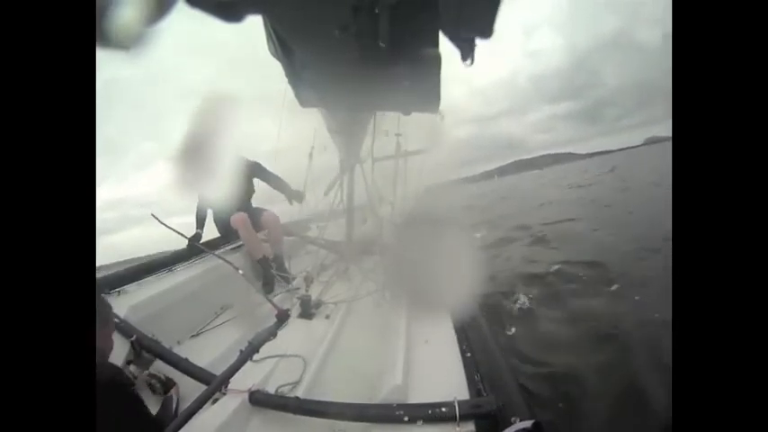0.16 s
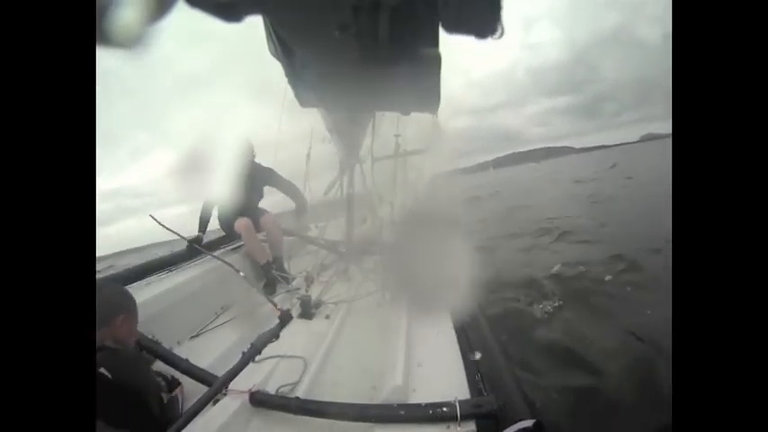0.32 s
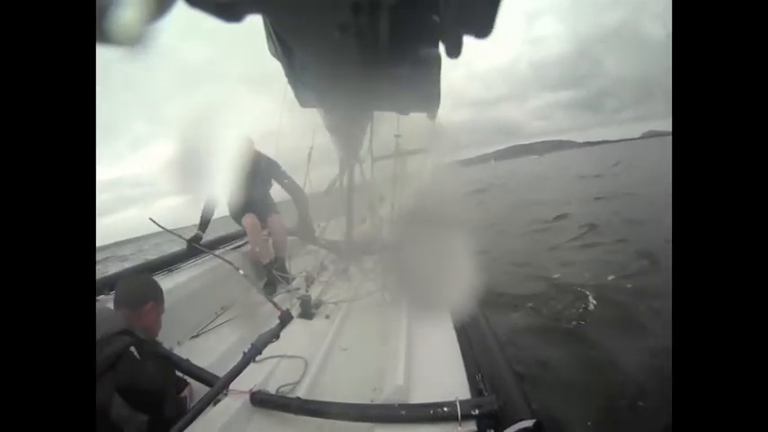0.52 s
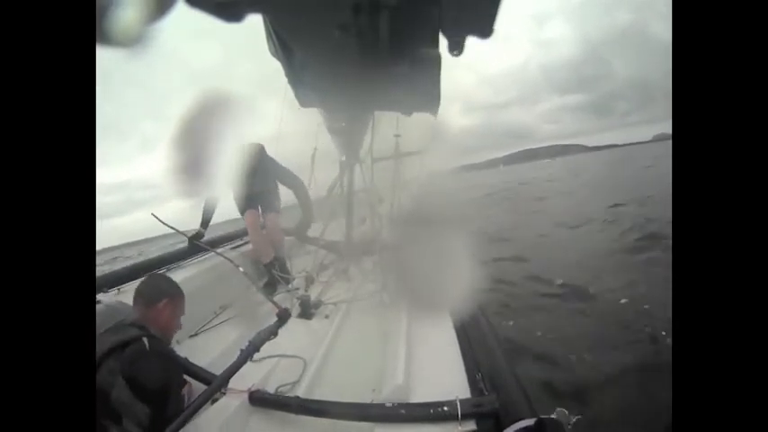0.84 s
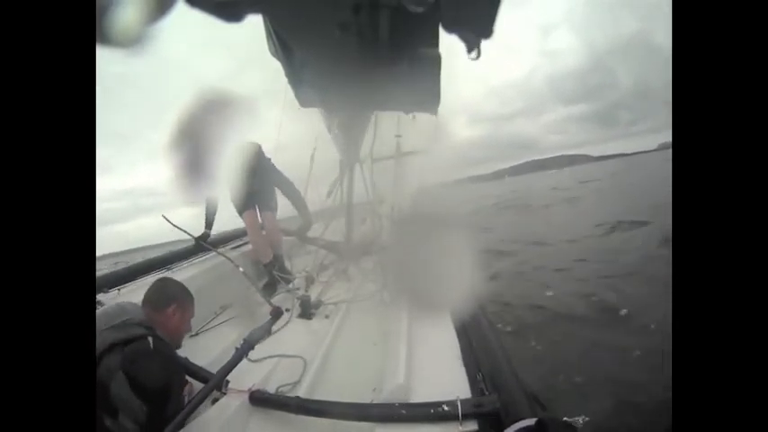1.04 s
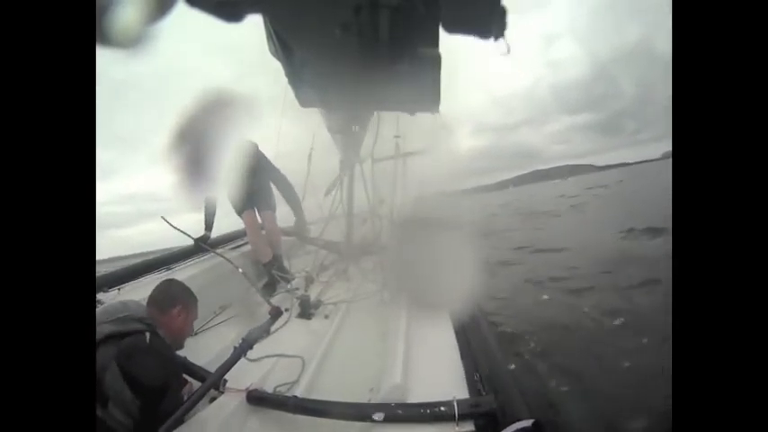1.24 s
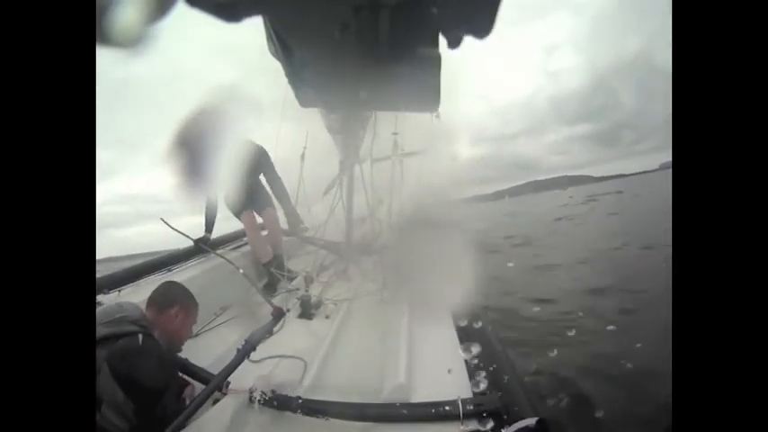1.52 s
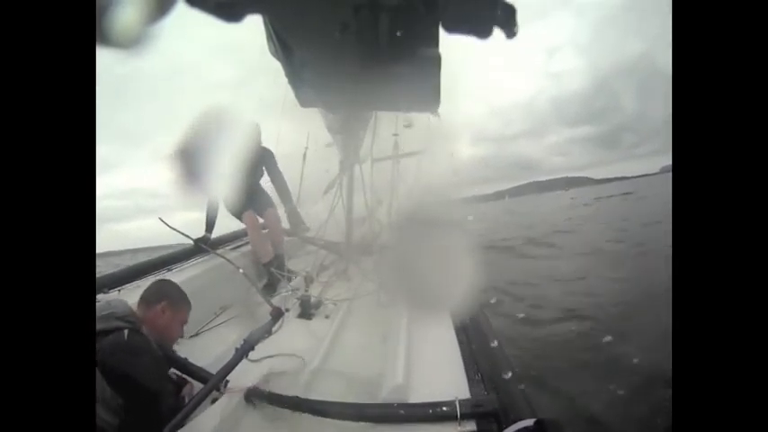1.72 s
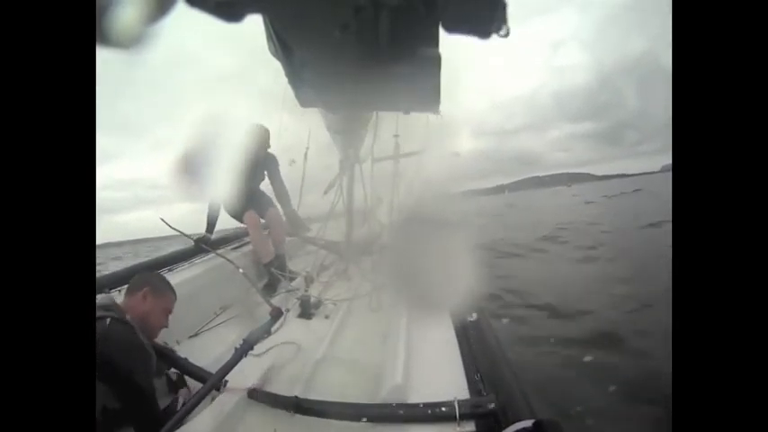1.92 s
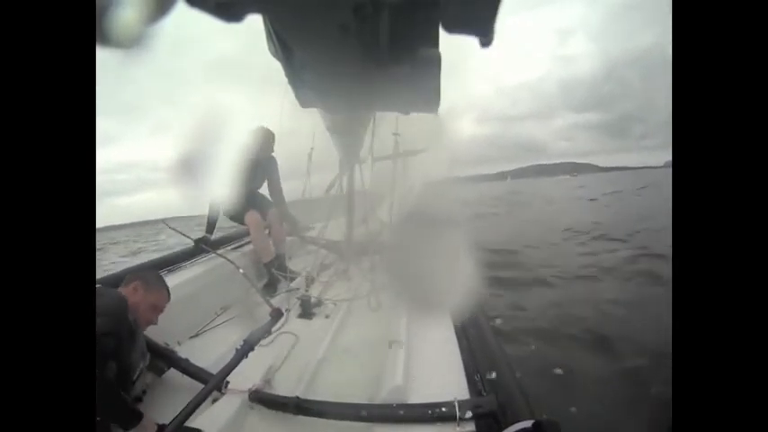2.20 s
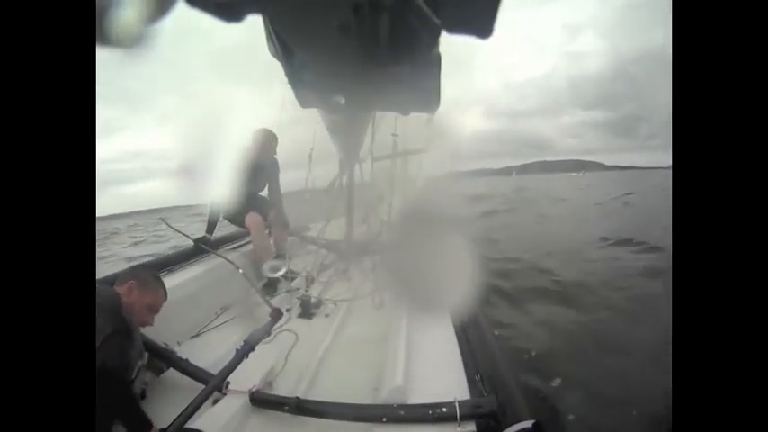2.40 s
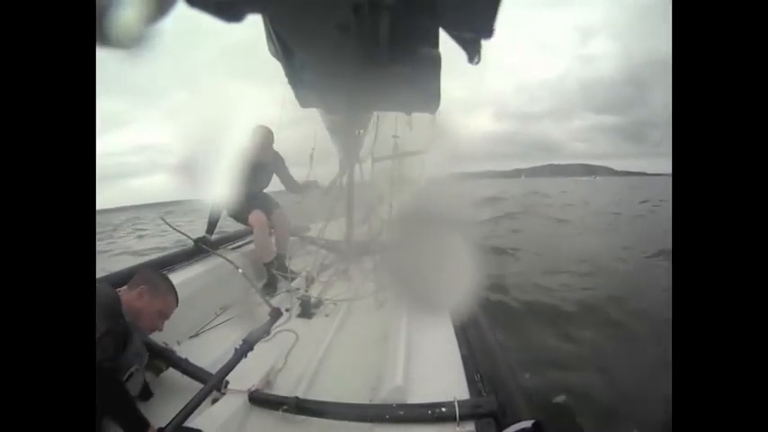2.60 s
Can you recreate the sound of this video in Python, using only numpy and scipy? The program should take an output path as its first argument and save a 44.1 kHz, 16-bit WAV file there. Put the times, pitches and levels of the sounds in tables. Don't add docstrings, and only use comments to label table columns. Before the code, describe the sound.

Water rushing and slapping along a small sailboat hull, with wind booms and one hard wave slam

```python
import sys
import numpy as np
from scipy import signal
from scipy.fft import rfft, irfft
from scipy.io import wavfile
from scipy.ndimage import uniform_filter1d

SR = 44100
rng = np.random.default_rng(int(sys.argv[2]) if len(sys.argv) > 2 else 0)


def unload_audio(sound):
    columns = np.transpose(np.atleast_2d(sound))
    steps = np.round(np.clip(columns, -1, 1) * 32767)
    wavfile.write(sys.argv[1], SR, steps.astype(np.int16))


def boost(x):
    u = np.asarray(x, float) / 20
    return 10 ** u


N = 121275
T = np.arange(N) / SR

# pitch in Hz, width in Hz, level in dB.
LOW_BODY = [(395.8, 31, -11.5), (640, 176, -3.5), (966, 119, -6.5), (1247, 115, -9)]
# pitch in Hz, width in Hz, level in dB.
HIGH_BODY = [(1961, 223, 0.5), (2494, 425, -4), (3260, 193, -0.5), (3916, 358, 0.5), (4273, 110, -3.5),
             (4445, 370, -2), (4733, 740, -3)]
SPREAD_DB = 11.5
SLAM_S = 0.2595


def evened(x):
    return x / np.sqrt(np.mean(x ** 2) + 1e-20)


def add(mix, s, sound):
    part = mix[round(s * SR):][:len(sound)]
    part += sound[:len(part)]


def resonate(x, hz, width):
    turn = np.exp(2j * np.pi * hz * T[:len(x)])
    r = np.exp(-np.pi * width / SR)
    return 2 * (turn * signal.lfilter([1 - r], [1, -r], x / turn)).real


def ring(x, modes):
    click = np.arange(2048) == 0
    body = np.zeros(2048)
    for k, (hz, width, db) in enumerate(modes):
        once = resonate(click, hz, 2 * width)
        body += (-1) ** k * boost(db) * resonate(once, hz, 2 * width)
    return signal.oaconvolve(x, body / np.linalg.norm(body))[:len(x)]


def patchy(gain, patch_db, flicker_db, size):
    frames, hz = 4 * N // size + 5, np.fft.rfftfreq(size, 1 / SR)
    a, b, patches = rng.standard_normal((frames, len(hz), 3)).T
    patches = uniform_filter1d(patches, size=3, axis=0)
    patches = evened(uniform_filter1d(patches, size=9, axis=1))
    flicker = evened(uniform_filter1d(rng.standard_normal(frames), size=4))
    z = (a + 1j * b) * gain(hz)[:, None] * boost(patch_db * patches + flicker_db * flicker)
    return evened(signal.istft(z, nperseg=size, noverlap=3 * size // 4)[1][:N])


def wind():
    # centre in seconds, width in seconds, level in dB, pitch in Hz.
    gusts = [(0.076, 0.096, -25.5, 84.6), (0.115, 0.042, -22, 94.5), (0.151, 0.044, -20.5, 84.2),
             (0.222, 0.021, -23.5, 85), (0.284, 0.016, -5.5, 86.7), (0.355, 0.071, -16, 82.6),
             (0.461, 0.062, -26.5, 88.06), (0.549, 0.0093, -16, 78.8), (0.65, 0.035, -20.5, 105),
             (0.676, 0.032, -14.5, 97.7), (0.711, 0.042, -15.5, 87.1), (0.798, 0.049, -24.5, 84),
             (0.827, 0.023, -14, 87.88), (0.891, 0.084, -24, 77.04), (0.993, 0.067, -15, 81.74),
             (1.085, 0.062, -19, 79.36), (1.152, 0.021, -18.5, 84), (1.271, 0.064, -24.5, 104.6),
             (1.464, 0.071, -20.5, 82.2), (2.223, 0.039, -27.5, 80), (1.695, 0.02, -24.5, 78.8),
             (1.929, 0.05, -33, 80.6), (2.079, 0.063, -25.5, 86.9), (2.169, 0.037, -13.5, 86.62),
             (2.31, 0.075, -21.5, 85.2), (2.362, 0.036, -11.5, 84), (2.422, 0.061, -20.5, 79.74),
             (2.465, 0.034, -26, 79.25), (1.243, 0.022, -24, 122.3), (0.956, 0.016, -20.5, 112),
             (2.495, 0.022, -16.5, 92.4), (2.525, 0.019, -14, 86.67), (2.554, 0.018, -20.5, 86.48)]
    # pitch in Hz, level in dB per Hz.
    spectrum = [(15, 6.5), (30, 5), (42, -0.5), (62, 5.5), (130, -3.5), (190, -17.5), (290, -18),
                (370, -26.5)]
    boom_hz, boom_width_hz, bed_db, overtone_db = 84, 13.5, -34.5, -28.5
    sag = 0.15
    split_hz, deep_follows, upper_follows = 170, 0.45, 0.17

    s, width, db, hz = np.transpose(gusts)[:, :, None]
    power = boost(2 * db) * np.exp(-8 * np.log(2) * ((T - s) / width) ** 2)
    hz = hz * (1 - sag * np.clip((T - s) / width, -1, 1))
    total = power.sum(0)
    pitch = ((power * hz).sum(0) + 1e-7 * boom_hz) / (total + 1e-7)
    turns = 2 * np.pi * np.cumsum(pitch) / SR
    boom = np.sqrt(2 * total) * (np.sin(turns) + boost(overtone_db) * np.sin(2 * turns))

    bed = resonate(rng.standard_normal(N), boom_hz, 2 * boom_width_hz)
    bed = evened(resonate(bed, boom_hz, 2 * boom_width_hz))

    f, level = np.transpose(spectrum)

    def gain(hz):
        return boost(np.interp(np.log(hz + 1), np.log(f), level, left=-30, right=-90))

    rumble = patchy(gain, 3.85, 4.2, size=4096)
    below_split = np.arange(N // 2 + 1) * SR / N < split_hz
    deep = irfft(rfft(rumble) * below_split, N)
    upper = rumble - deep
    swell = 1 + total / boost(2 * bed_db)
    rumble = deep * evened(swell ** (deep_follows / 2)) + upper * evened(swell ** (upper_follows / 2))
    return boom + boost(bed_db) * bed + boost(-31) * rumble


def bubbles(modes):
    per_s, cycles = 45, 8
    out = np.zeros(N)
    for hz in np.geomspace(modes[0][0], modes[-1][0], num=20):
        u = np.arange(0, 3 * cycles, hz / SR) / cycles
        tone = u * np.exp(-3 * u) * np.sin(2 * np.pi * cycles * u)
        size = boost(SPREAD_DB * np.minimum(rng.exponential(1, N), 3)) * (rng.random(N) < per_s / SR)
        out += signal.oaconvolve(size, tone * np.sqrt(hz))[:N]
    return evened(out)


def fizz():
    drops_per_s = 2000
    drops = boost(SPREAD_DB * np.minimum(rng.exponential(1, N), 4)) * (rng.random(N) < drops_per_s / SR)
    return evened(signal.lfilter([1], [1, -.98], drops) * rng.standard_normal(N))


def rush():
    # time in seconds, flow in dB, slosh in dB against the flow.
    flow = [(0.0, -60.5, 11), (0.09, -51.5, 0.5), (0.23, -55, 2.5), (0.46, -52, 5.5), (0.599, -50, 0),
            (0.67, -50, 5), (0.84, -50, -1), (1.48, -51.5, -0.5), (1.67, -54.5, 3), (1.85, -55, 3),
            (2.53, -53, 0), (2.75, -49, -8)]
    fizz_db, bubble_db = -18.5, -13
    s, flow_db, slosh_db = np.transpose(flow)
    out = np.zeros(N)
    for modes, db in ((LOW_BODY, flow_db + slosh_db), (HIGH_BODY, flow_db)):
        wash = patchy(np.ones_like, patch_db=2, flicker_db=2.5, size=256)
        drive = wash + boost(fizz_db) * fizz() + boost(bubble_db) * bubbles(modes)
        out += boost(np.interp(T, s, db)) * evened(ring(drive, modes))
    return out


def plinks():
    # start in seconds, level in dB, pitch in Hz,
    # length in seconds.
    bursts = [(0.116, -28, 184.5, 0.074), (.152, -49, 2080, .008), (0.173, -38.5, 3160, 0.0046),
              (0.498, -40, 3260, 0.0064), (0.613, -34, 616, 0.014), (0.79, -37, 4620, 0.0064),
              (0.812, -39.5, 2000, 0.011), (1.066, -39.5, 3850, .012), (1.188, -39, 3970, 0.0055),
              (1.203, -43.5, 2030, 0.0069), (1.301, -41, 3696, .008), (1.46, -35.5, 4280, 0.004),
              (1.505, -46.5, 3120, 0.0073), (1.518, -42, 3420, 0.0086), (1.573, -39.5, 2077, .01),
              (1.703, -44, 1207, 0.0084), (1.857, -45, 729, 0.014), (2.176, -41, 637, 0.028),
              (2.322, -38.5, 602, 0.0098), (2.494, -42, 3960, 0.01), (2.637, -45, 2170, .012),
              (2.686, -49, 1975, 0.013)]
    rough, rise = 0.6, 0.023
    out = np.zeros(N)
    for s, db, hz, length in bursts:
        u = T[:round(3 * length * SR)] / length
        noise = rng.standard_normal(len(u))
        wobble = 1 + rough * evened(uniform_filter1d(noise, size=len(u) // 12))
        swell = 3 * np.e * u * np.exp(-3 * u)
        tone = np.sin(2 * np.pi * hz * length * (u + rise * u ** 2 / 2))
        add(out, s, boost(db) * wobble * swell * tone)
    return out


def slaps():
    # start in seconds, low part in dB, high part in dB, t60 in seconds.
    hits = [(0.107, -41, -71, 0.17), (0.187, -29, -40, 0.028), (0.232, -33, -62, 0.074),
            (0.261, -45, -54.5, 0.019), (0.322, -37.5, -56, 0.18), (0.436, -28.5, -59, 0.064),
            (0.488, -27.5, -41, 0.028), (0.6, -33, -75, 0.054), (.637, -55, -35, 0.023),
            (0.652, -44, -35, 0.09), (0.665, -42, -38, .06), (0.679, -47, -52, 0.071),
            (0.718, -35.5, -67, 0.1), (0.797, -40, -37.5, 0.042), (.832, -55, -44.5, 0.021),
            (0.819, -38, -36.5, 0.072), (0.861, -30, -37, 0.047), (0.893, -34.5, -66, 0.054),
            (.551, -46, -42.5, 0.043), (.985, -61, -41.5, 0.079), (1.102, -51, -45.5, 0.04),
            (1.278, -55, -48, 0.024), (1.433, -35, -61, 0.042), (1.752, -41.5, -55, 0.06),
            (2.473, -61, -48.5, 0.047), (2.611, -62, -40, 0.054), (1.01, -37, -41.5, 0.11),
            (1.063, -38, -51, 0.12), (1.143, -31.5, -62, 0.094), (1.188, -47, -66.5, 0.029),
            (1.219, -36, -61, 0.11), (1.371, -33.5, -42.5, 0.049), (1.457, -34, -44, 0.04),
            (1.617, -29.5, -45.5, 0.051), (1.702, -57, -50, 0.044), (2.001, -32, -53, 0.066),
            (2.158, -36, -51, 0.23), (2.329, -37.5, -45.5, 0.1), (2.356, -32, -58, 0.091),
            (2.57, -69, -39.5, 0.025), (2.705, -33.5, -50, 0.065)]
    rise_s, bend = 0.0024, 1.4
    low_trim_db, high_trim_db = -8.5, -3.5
    low, high, t = np.zeros(N), np.zeros(N), T[:8000]
    noise = rng.standard_normal((len(hits), 2, 8000))
    for (s, low_db, high_db, t60), (a, b) in zip(hits, noise):
        shape = np.minimum(t / rise_s, 1) * boost(-60 * (t / t60) ** bend)
        add(low, s, boost(low_db + low_trim_db) * shape * a)
        add(high, s, boost(high_db + high_trim_db) * shape * b)
    return ring(low, LOW_BODY) + ring(high, HIGH_BODY)


def knocks():
    # start in seconds, level in dB, pitch in Hz, t60 in seconds.
    blows = [(0.2564, -26, 192, 0.017), (0.601, -27.5, 265, 0.036), (0.897, -28.5, 166, 0.14),
             (0.944, -35, 168, 0.084), (1.242, -31, 166, 0.39), (1.37, -25.5, 191.4, 0.068),
             (1.446, -27.5, 217.5, 0.059), (1.895, -29, 325.2, 0.06), (2.1, -34, 144.5, 0.22),
             (2.16, -32, 215.4, 0.15), (2.22, -33.5, 173, 0.64), (2.356, -27.5, 211.8, .1),
             (2.483, -24.5, 220, 0.053), (2.508, -17.5, 233.7, 0.036)]
    sag = 0.64
    out, t = np.zeros(N), T[:12000]
    for s, db, hz, t60 in blows:
        modes = np.zeros(len(t))
        for ratio, mode_db in ((1, 0), (1.85, -7), (3.4, -15)):
            fall = boost(mode_db - 60 * t * ratio ** 2.3 / t60)
            modes += fall * np.sin(2 * np.pi * hz * ratio * (t - sag * t ** 2))
        add(out, s, boost(db) * np.minimum(t / .0015, 1) * modes)
    return out


def ticks():
    # start in seconds, level in dB, centre in Hz, fall in dB per octave away, rattle in seconds.
    taps = [(.1745, -40, 3200, 8, .0005), (.2590, -26, 1300, 8, .0008), (.2588, -29, 4200, 5, .0025),
            (.323, -22, 700, 12, .0015), (.4365, -28, 750, 12, .003), (.5995, -24, 750, 14, .003),
            (.7185, -29, 800, 14, .003), (1.372, -29, 750, 10, .002), (1.4478, -27, 1000, 12, .002),
            (1.4495, -25, 1950, 45, .0015), (1.6015, -27, 2700, 14, .0006), (1.6030, -23, 2020, 40, .0015),
            (1.8942, -15, 2000, 2, .003), (2.0015, -27, 900, 12, .002), (2.4115, -25, 2150, 16, .002),
            (2.4115, -33, 820, 14, .002), (2.483, -28, 430, 14, .002), (2.509, -23, 500, 14, .002)]
    # pitch in Hz, level in dB, t60 in seconds.
    fitting = [(420, -2, .03), (820, -2, .018), (1050, -3, .008), (1290, 0, .009), (1550, -1, .007),
               (1870, -1, .012), (2070, 0, .018), (2400, -1, .012), (2730, -4, .01), (3200, -4, .012),
               (3520, -1, .016), (4300, -7, .008), (5300, -6, .006)]
    out, t = np.zeros(N), T[:3000]
    noise = rng.standard_normal((len(taps), 3000))
    for (s, db, centre_hz, fall_db, rattle_s), n in zip(taps, noise):
        body = np.zeros(len(t))
        for hz, mode_db, t60 in fitting:
            octaves = abs(np.log2(hz / centre_hz))
            body += boost(mode_db - fall_db * octaves - 60 * t / t60) * np.sin(2 * np.pi * hz * t)
        drive = (t == 0) + .075 * n * np.exp(-t / rattle_s)
        tick = signal.fftconvolve(drive, body * np.minimum(t / .0003, 1))[:3000]
        add(out, s, boost(db) * tick / abs(tick).max())
    return out


def slam():
    width_s, lead_s = 0.0017, 0.0185
    u = (T - SLAM_S) / width_s
    lead = .33 * np.exp(-.25 * (u + lead_s / width_s) ** 2)
    rebounds = np.exp(-.12 * (u - 4) ** 2)
    rebounds += .75 * np.exp(-.3 * (u + 2.8) ** 2)
    rebounds += .6 * np.exp(-.3 * (u + 7.3) ** 2)
    push = np.exp(-u ** 2 / 2)
    return boost(-1) * (.42 * rebounds - lead - push)


def scene():
    return (wind() + rush() + plinks() + slaps() + knocks() + ticks() + slam())[None]


def limiter(x):
    duck_db, attack_s, hold_s, back_s = -17, 0.0078, 0.04, 0.13
    since = T - SLAM_S - .008
    duck = np.clip(since / attack_s, 0, 1) * np.clip(1 - (since - hold_s) / back_s, 0, 1)
    return x * boost(duck_db * duck)


def coarse_sampling(x):
    guard_hz, guard_width_hz, edge_hz = 4520, 1470, 15330
    hz = np.fft.rfftfreq(N, 1 / SR)
    guard = boost(-6 * np.logaddexp(0, (hz - guard_hz) / guard_width_hz) ** 2) * (hz < 6000)
    coarse = irfft((rfft(x) * guard)[:16501], 33000) * 33000 / N
    steps = rfft(np.repeat(coarse, 4))[:N // 2 + 1]
    return irfft(steps * (hz < edge_hz), N) * N / 132000


def low_pass(x):
    return signal.sosfilt(signal.butter(12, 15800, fs=SR, output="sos"), x)


def record(dry):
    held = coarse_sampling(limiter(dry[0]))
    return low_pass(held[None])


dry = scene()
out = record(dry)
unload_audio(out)
```